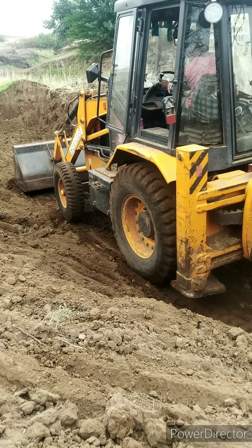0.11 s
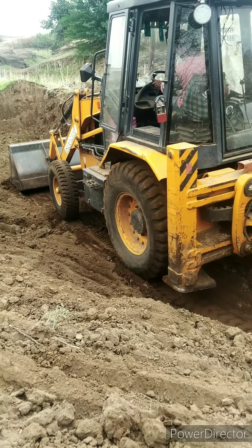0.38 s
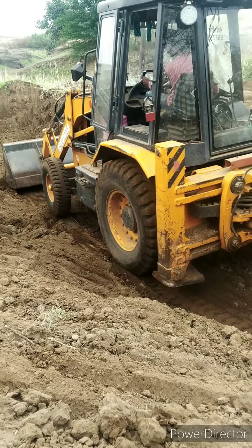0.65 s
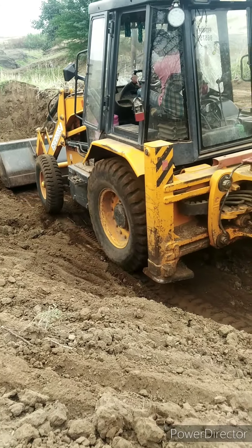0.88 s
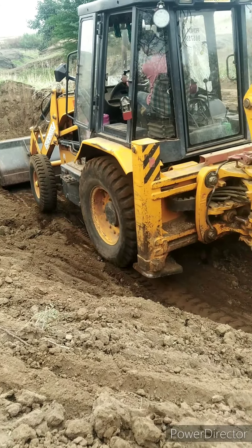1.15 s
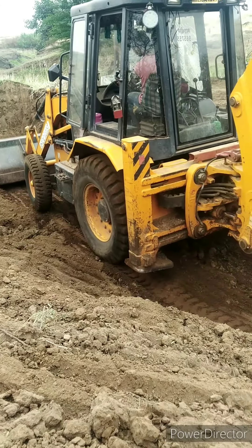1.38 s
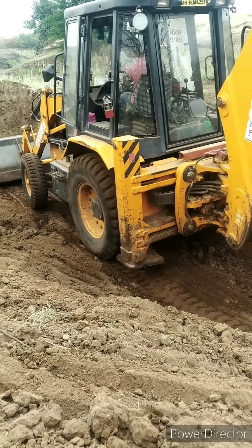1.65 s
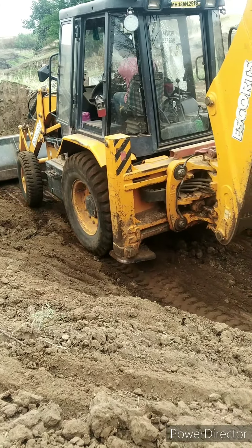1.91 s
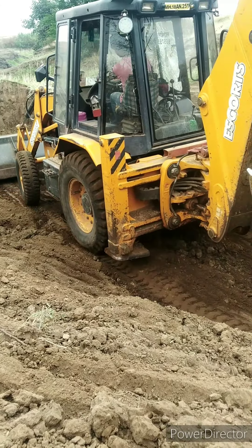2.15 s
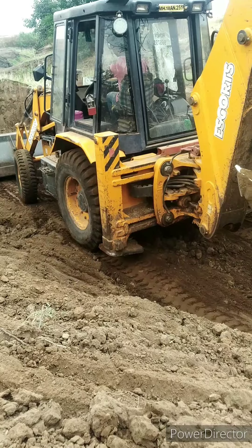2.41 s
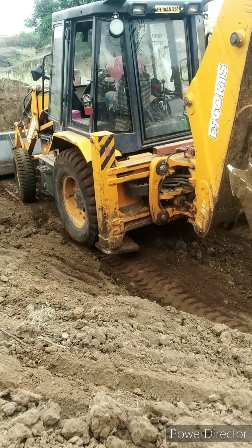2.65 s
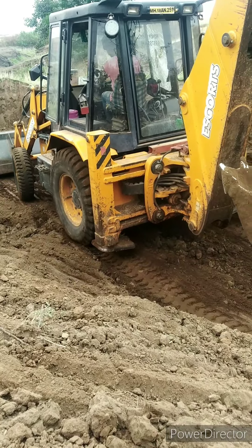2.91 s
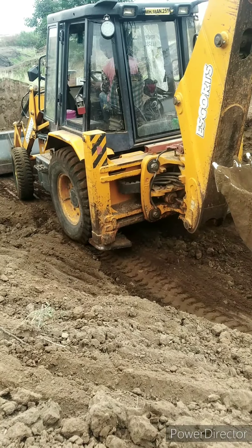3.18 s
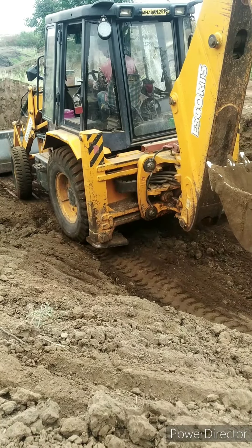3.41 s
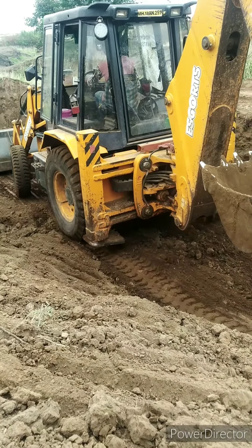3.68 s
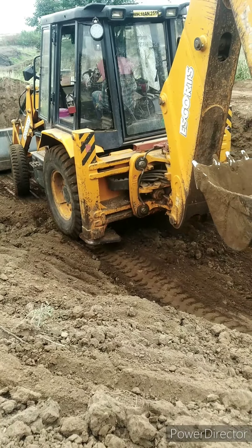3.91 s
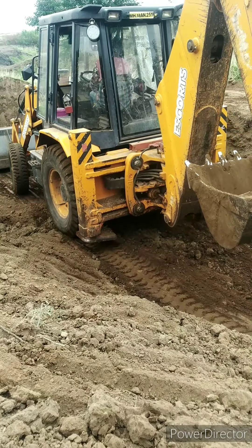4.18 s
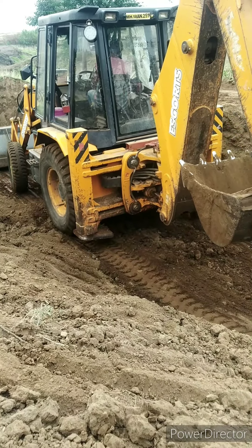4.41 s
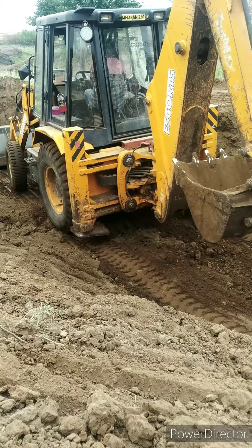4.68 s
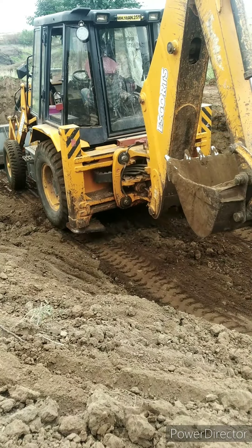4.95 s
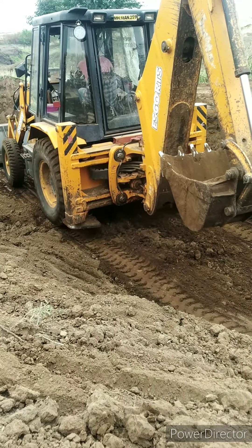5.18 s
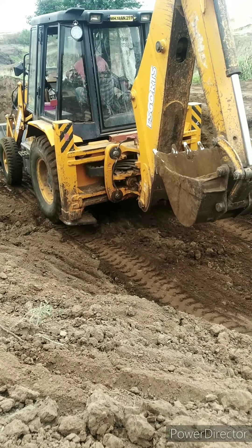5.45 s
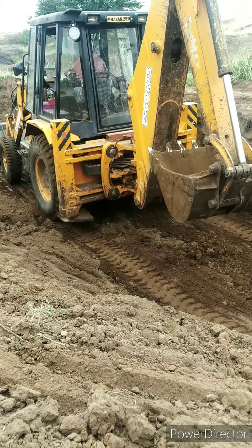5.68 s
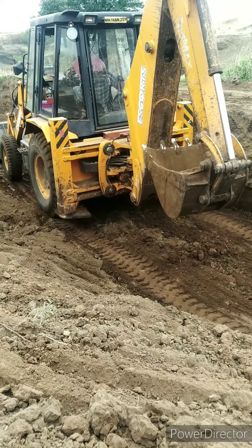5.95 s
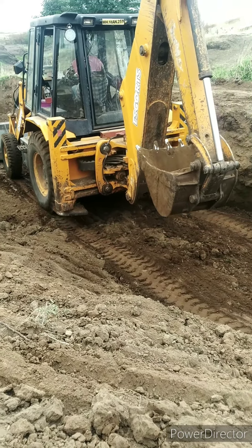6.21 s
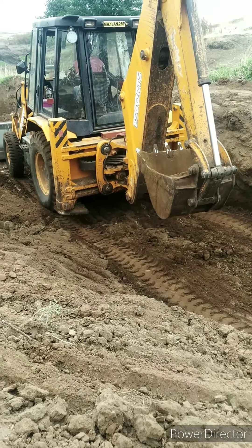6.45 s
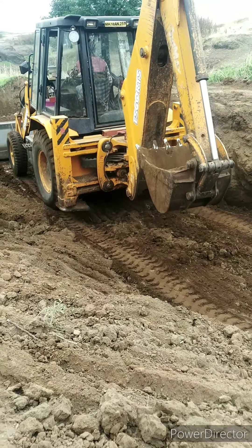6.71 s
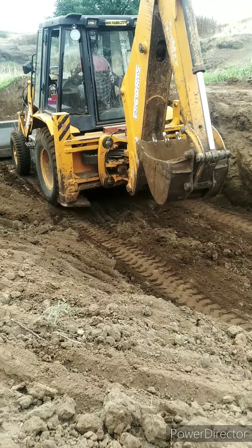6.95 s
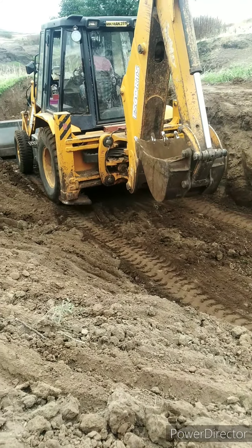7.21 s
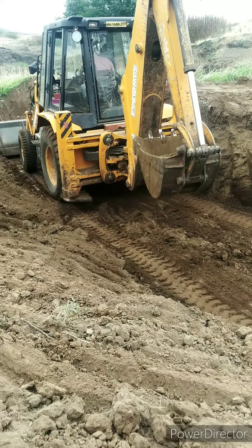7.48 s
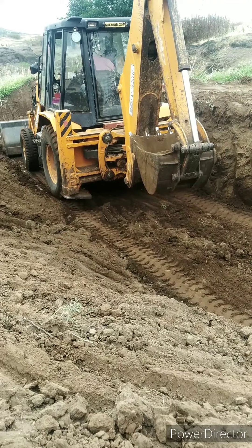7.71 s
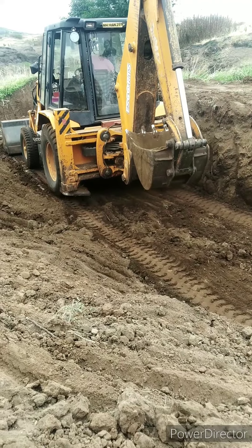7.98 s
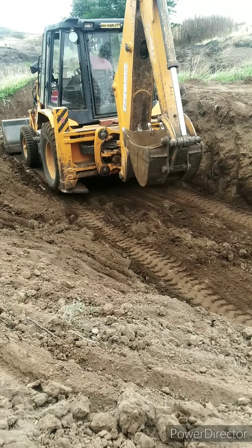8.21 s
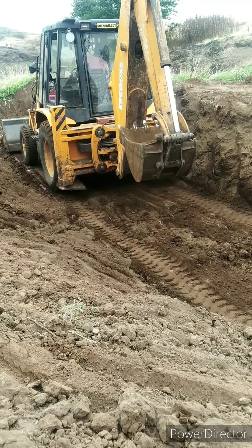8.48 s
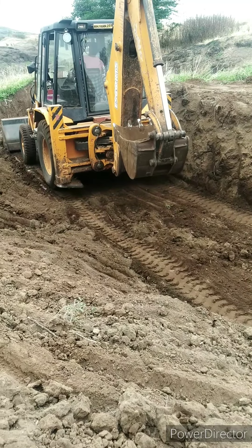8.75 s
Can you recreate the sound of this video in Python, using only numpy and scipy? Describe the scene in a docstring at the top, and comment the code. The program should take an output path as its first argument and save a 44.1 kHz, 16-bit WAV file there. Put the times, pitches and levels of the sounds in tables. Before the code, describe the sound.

Outdoors, a four-cylinder diesel earthmover runs at nearly constant speed a few metres away, slowly receding over soft soil. Low exhaust drone, knocking clatter, ringing panels, hydraulic hum and airy fan roar continue throughout. Small squeaks and dull thumps come early; after the middle a light rattle leads into an air puff and a sharp metallic clunk, then a faint gear whine rises. Phone-like stereo pickup, no deep bass.

```python
"""Field take on a two-port phone: a four-cylinder diesel loader crawls away over soft soil, from 5 m off.
Throughout, at nearly steady engine speed: exhaust tones and a geared pump hum (sines), a turbo whistle, knock and
valve clatter (gated noise), pinging panels (resonators), fan roar and rumble on the soil (coloured noise).
Early on come a thin squeak, then dull thumps and another squeak; near 5.8 s a rattle grows,
at 6.2 s air puffs, at 6.4 s the linkage clunks, a last squeak follows, and from 7.1 s a faint gear whine glides."""
import sys
import numpy as np
from scipy import signal
from scipy.fft import rfft, irfft
from scipy.io import wavfile
from scipy.ndimage import uniform_filter1d

SR = 44100
rng = np.random.default_rng(int(sys.argv[2]) if len(sys.argv) > 2 else 0)


def int16_out(signal):
    """Quantize to a 16-bit WAV file."""
    q = np.round(np.clip(np.atleast_2d(signal).T, -1, 1) * 32767)
    wavfile.write(sys.argv[1], SR, q.astype(np.int16))


def amplitude_ratio(level_db):
    """Convert a level in decibels to the matching linear amplitude (field) ratio."""
    exponent = np.asarray(level_db, float) / 20
    return 10 ** exponent


N = 390714
HZ = np.fft.rfftfreq(N, 1 / SR)
T = np.arange(N) / SR


def over_time(table):
    """Columns of a curve table at every sample."""
    s, *columns = np.transpose(table)
    return [np.interp(T, s, c) for c in columns]


def over_pitch(table):
    """Columns of a frequency table at every bin, straight on a log axis."""
    hz, *columns = np.transpose(table)
    return [np.interp(np.log(HZ + 1), np.log(hz), c) for c in columns]


def bumps(table):
    """Smooth rises in dB, each centred on its time."""
    rise_db = 0
    for s, length_s, db in table:
        place = np.clip((T - s) / length_s, -.5, .5)
        rise_db = rise_db + db * np.cos(np.pi * place) ** 2
    return rise_db


def walk(rate):
    """Random levels held 1 / rate s and slewed twice; spread near 1."""
    k = int(SR / rate)
    held = np.repeat(rng.standard_normal(N // k + 1), k)
    return 1.3 * uniform_filter1d(uniform_filter1d(held, k), k)[:N]


def noise(colour_db, gate=1.):
    """Gated noise of a given colour, rms 1: a direct part and a scattered part under the same gate."""
    x = irfft(rfft(gate * rng.standard_normal((2, N))) * amplitude_ratio(colour_db), N)
    return x / x.std()


def turn(hz):
    """Running angle of a moving frequency."""
    return 2 * np.pi * np.cumsum(hz) / SR


def tone(db, angle):
    """A sine of given rms level at a random phase."""
    return np.sqrt(2) * amplitude_ratio(db) * np.sin(angle + 2 * np.pi * rng.random())


def exhaust(angle, clatter_db):
    """Four clear tones waver as the path over the soil changes; fainter tones are locked to the crank."""
    # exhaust as the machine turns its back: t/s, mean level/dB of multiples 1, 2, 3 and 5 of the firing rate
    tones = [(0, -27, -36.5, -44, -42), (0.501, -26.5, -32.5, -31, -36), (1.3, -26, -33, -38.5, -42),
             (1.8, -27, -37, -36, -57), (2.5, -26, -37, -39, -45), (2.95, -26, -37, -41, -40.5),
             (3.17, -24, -38.5, -37, -35), (3.35, -25, -42, -37, -47), (3.7, -27, -42, -39, -55),
             (4.5, -26.5, -36, -39, -60), (5.7, -27, -31, -38, -39), (6.5, -27.5, -31, -40, -39),
             (7.3, -28.5, -31, -36, -44.5), (8.0, -30, -29, -50, -41.5), (8.86, -30, -27.5, -41, -48)]
    # waver of each of these tones: spread/dB
    wavers = (.5, .8, 1.8, 2)
    # fainter tones at the start: multiple of the firing rate, level/dB re engine clatter
    overtones = [(1.25, -10), (4, -7), (4.75, -13), (5.75, -14), (6, -5), (6.25, -11), (8, -12), (9, -14),
                 (9.5, -17), (11.75, -15), (14, -19), (14.25, -17), (15, -15), (16.5, -20), (27, -21)]
    fade_db_s = 0.77  # the body of the machine shades the fainter tones more as it turns
    out = 0
    for k, db, waver_db in zip((1, 2, 3, 5), over_time(tones), wavers):
        out = out + tone(db + waver_db * walk(4), k * angle)
    for k, db in overtones:
        level_db = clatter_db + db - fade_db_s * T + 2.6 * walk(2.99)
        out = out + tone(level_db, k * angle + .5 * walk(8))
    return out


def pump(crank):
    """Gear teeth driven by the crank hum, slightly unsteady, with an octave."""
    # hydraulic pump: t/s, hum level/dB, octave level/dB (1 dB above what is played)
    hum = [(0, -38, -41), (.3, -33, -37.5), (.75, -37, -39), (1.0, -37.5, -33), (1.4, -34, -39.5),
           (1.85, -31.5, -35), (2.1, -34, -50), (3.5, -31, -46), (5.2, -31, -43.5), (5.7, -30.5, -42.5),
           (6.5, -31, -40.5), (6.7, -31, -49), (6.95, -37, -48.5), (7.15, -30, -39.5), (8.4, -30.5, -43),
           (8.86, -30, -51)]
    teeth_per_firing = 3.641
    hum_db, octave_db = over_time(hum)
    angle = teeth_per_firing * crank + 0.176 * walk(11)
    low = tone(hum_db + .6 * walk(4), angle)
    return low + tone(octave_db - 1 + 3.2 * walk(6), 2 * angle + .6 * walk(15))


def turbo(away_db):
    """A thin whistle whose pitch trembles."""
    # turbo whistle: t/s, f/Hz before the tremble
    whistle = [(0, 8230), (.8, 8370), (1.4, 8500), (2.1, 8370), (2.8, 8410), (3.35, 8570), (4.1, 8470),
               (4.6, 8500), (5.3, 8390), (5.75, 8430), (6.2, 8350), (6.7, 8420), (7.15, 8640), (7.8, 8440),
               (8.4, 8270), (8.86, 8230)]
    start_db, tremble_hz = -61.5, 36 * walk(120)
    return tone(start_db + away_db + 2.2 * walk(25), turn(over_time(whistle)[0] + tremble_hz))


def firing_gate(angle):
    """Each firing starts a burst that fades into the next; cylinders differ a little."""
    # mean burst size of the four cylinders in turn: level/dB
    cylinder_db = np.array([2, -.8, 1, -1.2])
    cycles = angle / (2 * np.pi)
    k = cycles.astype(int)
    size_db = 1.8 * rng.standard_normal(N // 500)[k] + cylinder_db[k % 4]
    phase = cycles % 1  # in firings
    burst = (1 - np.exp(-phase / 0.029)) * np.exp(-phase / 0.44)
    return 0.89 + amplitude_ratio(size_db) * burst


def knock(gate, body_db, sharp_db):
    """The part of each burst that is new every time rings the casing; its sharp edge has its own level."""
    # knock before the casing rings: f/Hz, relative level/dB per Hz
    knock_colour = [(150, -28), (250, 9), (400, -3.5), (550, -2), (720, -4), (1050, -2), (1350, -6),
                    (1700, -13), (2100, -10), (2600, -11), (4000, -19), (7000, -25.5), (15000, -61)]
    # engine casing resonances: f/Hz, width/Hz, rise/dB
    casing = [(527, 29, 9.5), (620, 17, -5), (613, 11, 2), (1070, 400, 0), (1200, 50, 0), (1570, 110, 1.5),
              (1760, 51, -4)]
    rings_db = sum(db / (1 + (2 * (HZ - hz) / width) ** 2) for hz, width, db in casing)
    burst = rfft(noise(over_pitch(knock_colour)[0] + rings_db, gate))
    upper = np.clip(np.log2((HZ + 1) / 900), 0, 1)  # the edge takes over from 900 to 1800 Hz
    body = irfft(burst * (1 - upper), N)
    edge = irfft(burst * upper, N)
    return amplitude_ratio(body_db - 4.0) * body + amplitude_ratio(sharp_db) * edge


def valve_gear(angle, gate):
    """Valves and injectors repeat their clatter every four firings; each cycle keeps most of the last pattern."""
    # repeating valve clatter: f/Hz, relative level/dB per Hz
    clatter_colour = [(100, -39), (180, -12), (300, -7.5), (520, 2), (750, -11), (1100, -1), (1600, -8),
                      (2300, -11), (3200, -30), (5000, -60)]
    kept = .84  # share of the pattern that survives one engine cycle
    cycle = angle / (8 * np.pi)
    k, place = cycle.astype(int), (cycle % 1 * 4000).astype(int)
    fresh = rng.standard_normal((2, int(cycle[-1]) + 21, 4000))
    patterns = signal.lfilter([1], [1, -kept], fresh, axis=1)[:, 20:]  # the first 20 only settle it
    x = irfft(rfft(gate * patterns[:, k, place]) * amplitude_ratio(over_pitch(clatter_colour)[0]), N)
    return x / x.std()


def panels(angle):
    """Every firing pings each sheet-metal panel with its own chance strength and sign, and the panel rings."""
    # panels at the start: f/Hz, rms level/dB re engine clatter, t60/s
    sheets = [(488, -13.5, .25), (521.4, -10, 0.16), (552.4, -13.5, 0.24), (616, -14, 0.24),
              (740.5, -18.5, 0.17), (930, -19.5, 0.16), (1050, -16, 0.11), (1187, -17.5, .15),
              (1350, -22.5, .12), (1440, -20, .12), (1570, -21.5, .12), (1835, -23, 0.11), (2030, -23, .1),
              (2250, -24, 0.096), (2750, -29, .07)]
    scatter_db = 3.5  # some firings ping a panel much harder
    habit_weight = .8  # of what repeats each engine cycle
    fade_db_s = .3
    fired = np.flatnonzero(np.diff((angle / (2 * np.pi)).astype(int)))
    out = 0
    for hz, db, t60 in sheets:
        pings = np.zeros(N)
        sign, size = rng.standard_normal((len(fired), 2)).T
        habit = rng.standard_normal(4)[np.arange(len(fired)) % 4]  # each cylinder tends to ping it alike
        pings[fired] = (sign + habit_weight * habit) * amplitude_ratio(scatter_db * size)
        pole = np.exp(2j * np.pi * hz / SR - np.log(1000) / (t60 * SR))
        ring = signal.lfilter([1], [1, -pole], pings).imag
        out = out + amplitude_ratio(db) * ring / ring.std()
    return amplitude_ratio(-fade_db_s * T) * out


def fan(angle, roar_db, hiss_db):
    """Air roar; its treble has its own level, breathes with the firings and flutters band by band."""
    # fan air: f/Hz, relative level/dB per Hz
    air_colour = [(100, -55), (200, 1), (350, -1), (500, -0.5), (750, -10.5), (1100, -9.5), (2000, -17.5),
                  (3000, -20.5), (5000, -19.5), (6300, -20.5), (7600, -24.5), (8600, -24.5), (10500, -27),
                  (12000, -30.5), (13500, -37), (15400, -42.5)]
    # the treble swells briefly: centre t/s, length/s, rise/dB
    swells = [(1.1, .2, 2), (2.3, 0.34, 0), (3.15, 0.25, 1), (3.75, .15, 2.5), (4.45, 0.26, 1.5),
              (5.5, .2, 4), (6.3, 0.63, 4), (6.85, .5, 4), (7.02, .1, 2), (8.49, .12, 2)]
    air = rfft(noise(over_pitch(air_colour)[0]))
    octave = np.log2((HZ + 1) / 2000)
    low = irfft(air * np.clip(1 - octave, 0, 1), N)
    flutter = walk(12)  # shared by the bands
    treble = 0
    for k in (1, 2, 3):
        band = irfft(air * np.clip(1 - abs(octave - k), 0, 1), N)
        treble = treble + band * amplitude_ratio(.8 * flutter + .8 * walk(9))
    treble_db = hiss_db + bumps(swells) + 0.77 * np.cos(angle)
    return low * amplitude_ratio(roar_db - 1.0) + treble * amplitude_ratio(treble_db)


def rolling():
    """Tyres and frame rumble unevenly on the soil; jolts shake both."""
    # frame and tyres before jolts: t/s, rumble level/dB, body boom level/dB
    frame_level = [(0, -33.5, -50), (.35, -35.5, -37), (.8, -33, -35), (1.4, -32, -34), (1.65, -34, -41.5),
                   (3.3, -35.5, -38), (4.6, -36, -40.5), (5.3, -35.5, -37.5), (6.15, -36, -39),
                   (6.6, -31.5, -39.5), (7.05, -32.5, -39), (7.2, -34, -43), (7.9, -35.5, -40.5),
                   (8.86, -33.5, -40)]
    # jolts as the bucket bites: centre t/s, length/s, rise/dB
    jolts = [(3.15, 0.21, 3), (6.38, 0.27, 8), (6.55, .3, 4), (6.93, 0.3, 4), (7.68, 0.1, 3)]
    # rumble: f/Hz, relative level/dB per Hz
    rumble_colour = [(30, -30), (42, -16), (48, -0.5), (80, -5.5), (100, -2.5), (125, 3), (150, 1),
                     (190, -8), (300, -14), (1000, -91)]
    # body boom: f/Hz, relative level/dB per Hz
    boom_colour = [(100, -22), (170, -1), (230, 2.5), (270, -12.5), (300, -2.5), (400, -11), (800, -35),
                   (2000, -90)]
    rumble_db, boom_db = over_time(frame_level) + bumps(jolts)
    rumble = amplitude_ratio(rumble_db + 1.3 * walk(6)) * noise(over_pitch(rumble_colour)[0])
    return rumble + amplitude_ratio(boom_db + 1.3 * walk(3.97)) * noise(over_pitch(boom_colour)[0])


def squeaks():
    """A dry pin gives short unsteady whistles."""
    # squeaks: start t/s, end t/s, mean f/Hz, mean level/dB
    whistles = [(.495, .535, 3480, -48), (.865, 0.93, 10050, -53), (6.513, 6.67, 10800, -57.5)]
    out = 0
    for start, end, hz, db in whistles:
        shape = np.clip(np.minimum(T - start, end - T) / 0.015, 0, 1)
        pitch_hz = hz + 40 * walk(22) + 70 * walk(250)
        out = out + shape * tone(db + 3 * walk(90), turn(pitch_hz))
    return out


def blows():
    """Each blow pushes for a moment, then the frame rings; a harder contact cracks and wakes the upper modes."""
    # blows in linkage and frame: t/s, peak level/dB of the ring, brightness/dB (in full from 800 Hz up)
    hits = [(.735, -20, -5), (1.327, -22, -16), (1.77, -22, -20), (2.642, -25, -3), (3.148, -16, -34),
            (3.19, -18, -24), (6.285, -25, 0), (6.308, -23, 0), (6.319, -22, -12), (6.3781, -19, 0),
            (6.38, -15, 0), (6.3845, -8, -8), (6.392, -24, 0), (6.447, -21, -30), (7.68, -22, -22)]
    # frame modes before the push smooths them: f/Hz, level/dB, t60/s
    modes = [(70, -6, .2), (135, 0, .14), (205, 2, .11), (290, -4, .07), (420, -6, .06), (560, -5, .05),
             (700, 0, .05), (860, -9, .035), (1040, 2, .075), (1250, -5, .035), (1540, -9, .08),
             (1950, -14, .03)]
    # crack of a hard contact: f/Hz, relative level/dB per Hz
    crack_colour = [(200, -28), (450, -5), (1050, 0), (1600, -15), (2300, -11), (6000, -43)]
    crack_db, crack_t60_s = -15.5, .06  # re the peak of the ring, before brightness
    out, t = np.zeros(N), T[:SR // 3]
    push = np.hanning(31)
    grit = noise(over_pitch(crack_colour)[0])[0]
    for s, db, bright_db in hits:
        ring = 0
        for hz, mode_db, t60 in modes:
            decay = amplitude_ratio(mode_db + bright_db * min(hz / 800, 1) - 60 * t / t60)
            ring = ring + decay * np.cos(2 * np.pi * hz * t)
        ring = np.convolve(ring, push)[:len(t)]
        at = int(s * SR)
        crack = amplitude_ratio(crack_db + bright_db - 60 * t / crack_t60_s) * grit[at:at + len(t)]
        out[at:at + len(t)] += amplitude_ratio(db) * (ring / abs(ring).max() + crack)
    return out


def rattle():
    """A loose part on the strained frame gives evenly spaced rings of one pitch, growing towards the clunk."""
    from_s, to_s, every_s = 5.785, 6.2, .0895  # roughly every four firings
    hz, t60_s, start_db, grows_db_s = 1025, .06, -32, 9
    out = 0
    for s in np.arange(from_s, to_s, every_s):
        t = np.maximum(T - s, 0)
        db = start_db + grows_db_s * (s - from_s) + 1.95 * rng.standard_normal()
        shape = amplitude_ratio(db - 60 * t / t60_s) * (1 - np.exp(-t / 0.0034))
        out = out + shape * np.sin(2 * np.pi * hz * t)
    return out


def puffs():
    """Air rushes from a valve, holds raggedly and dies away; each half octave of the jet sputters apart."""
    # puffs: start t/s, hold/s, level/dB before the sputter
    releases = [(6.203, 0.058, -38), (6.337, 0.044, -51)]
    # air jet: f/Hz, relative level/dB per Hz
    jet_colour = [(2000, -28), (2900, -6), (3400, -16), (4300, -9), (5000, -12), (6100, 2), (7200, -6),
                  (8100, -1), (9600, -14), (10500, -8), (12000, -17), (15000, -31)]
    attack_s, release_s = 0.032, 0.047
    shape = 0
    for s, hold, db in releases:
        attack = np.clip((T - s) / attack_s, 0, 1) ** 2
        after = np.maximum(T - s - attack_s - hold, 0)
        shape = shape + amplitude_ratio(db) * attack * np.exp(-(after / release_s) ** 2)
    jet = rfft(noise(over_pitch(jet_colour)[0]))
    half_octave = np.clip(2 * np.log2((HZ + 1) / 4300), 0, 3)
    out = 0
    for k in range(4):
        band = irfft(jet * np.clip(1 - abs(half_octave - k), 0, 1), N)
        out = out + amplitude_ratio(1.3 * walk(160) + 2 * walk(40)) * band
    return shape * out


def whine():
    """A thin gliding tone of the drive gears rises as the wheels gather speed."""
    # gear whine: t/s, mean f/Hz, level/dB (1.5 dB above the mean played)
    glide = [(0, 385, -70), (7.05, 385, -70), (7.2, 396, -47), (7.5, 410, -48), (7.62, 420, -54),
             (7.8, 436, -47), (8.1, 444, -48), (8.35, 455, -46), (8.6, 447, -50), (8.86, 445, -54)]
    hz, db = over_time(glide)
    return tone(db - 1.5 + 2.5 * walk(8), turn(hz + 3 * walk(10)))


def ports(direct, scattered):
    """The left port hears later, shaded by the phone; scattered sound differs more between ports in the treble."""
    # two microphone ports: f/Hz, likeness/0-1, left minus right/dB, left lag/rad
    pair = [(40, 1, 1.5, .05), (235, 0.99, 1.95, 0.075), (490, 0.93, 2.5, 0.38), (716, 0.91, 5.5, 0.84),
            (1050, 0.94, 2, 1.39), (1286, 0.91, -1.5, 2.02), (1680, 0.43, -8.5, 1.07),
            (1870, 0.84, -1, 0.69), (2400, 0.43, -3, 2.38), (2900, 0.3, -7, 1.66), (3500, 0, -1.5, 1.3),
            (5540, 0.45, -1, 3.1), (7450, 0, -2.5, 6.5), (10400, 0, -7.5, 7.5), (13600, 0.1, -16.5, 4.9),
            (14700, 0, -27.5, 8.6)]
    like, tilt_db, lag = over_pitch(pair)
    like = np.clip(like, 0, 1)
    clear, (first, second) = rfft(direct), rfft(scattered)
    left = (clear + first) * np.exp(-.5j * lag) * amplitude_ratio(tilt_db / 2)
    right = clear + like * first + np.sqrt(1 - like ** 2) * second
    right = right * np.exp(.5j * lag) * amplitude_ratio(-tilt_db / 2)
    return irfft(np.array([left, right]), N)


def scene():
    """Tones and blows arrive straight; the noisy parts also arrive scattered by machine and soil."""
    # engine speed before a slight waver: t/s, firing rate f/Hz
    speed = [(0, 44.27), (.8, 43.92), (1.3, 44.03), (1.65, 44.24), (2.25, 43.83), (3.1, 43.78),
             (3.7, 43.75), (5.0, 44.08), (5.9, 43.99), (6.25, 43.76), (6.55, 43.89), (6.8, 43), (7.0, 43.2),
             (7.2, 44.2), (8.86, 44.27)]
    start_m, crawl_m_s = 5.1, 0.61  # distance at the start, and how fast it grows
    clatter_start_db, sharp_start_db, hiss_start_db = -35.5, -37.5, -35  # engine, knock edge, fan treble
    angle = turn(over_time(speed)[0] + .06 * walk(4))
    away_db = -20 * np.log10(1 + crawl_m_s * T / start_m)
    clatter_db = clatter_start_db + away_db + 0.11 * walk(2.7)
    gate = firing_gate(angle)
    clear = exhaust(angle, clatter_db) + pump(angle) + turbo(away_db)
    clear = clear + amplitude_ratio(clatter_db) * panels(angle)
    clear = clear + squeaks() + blows() + rattle() + whine()
    noisy = knock(gate, clatter_db, sharp_start_db + away_db + 0.5 * walk(2.48))
    noisy = noisy + amplitude_ratio(clatter_db - .5) * valve_gear(angle, gate)
    noisy = noisy + fan(angle, clatter_db, hiss_start_db + away_db)
    return ports(clear, noisy + rolling() + puffs())


def roll_off(x):
    """The treble ends steeply here."""
    return signal.sosfilt(signal.butter(12, 15430, fs=SR, output="sos"), x)


def record(dry):
    """The microphone drops the deepest bass, below 30 Hz."""
    bass_cut = signal.butter(2, 30, "high", fs=SR, output="sos")
    mix = signal.sosfilt(bass_cut, dry)
    return roll_off(mix)


dry = scene()
out = record(dry)
int16_out(out)
```